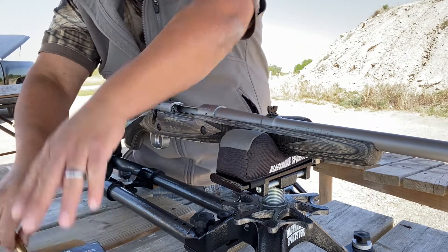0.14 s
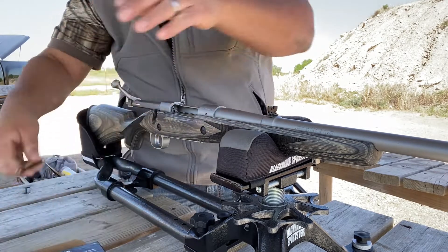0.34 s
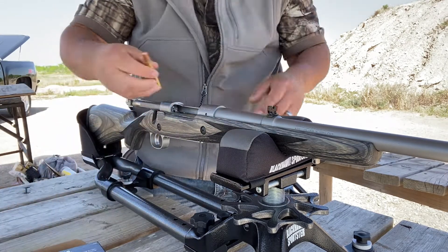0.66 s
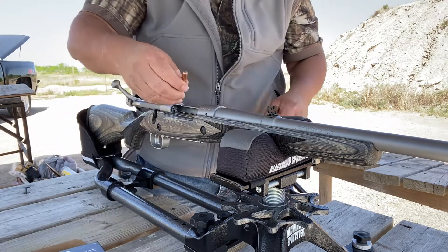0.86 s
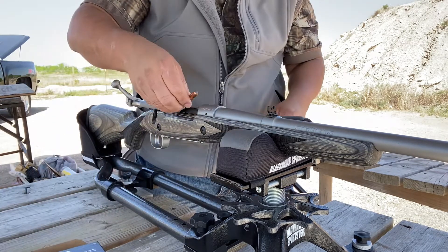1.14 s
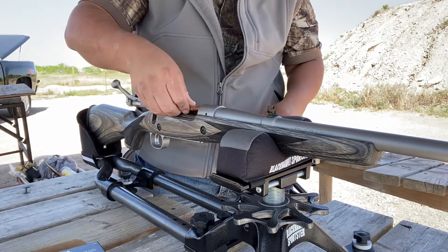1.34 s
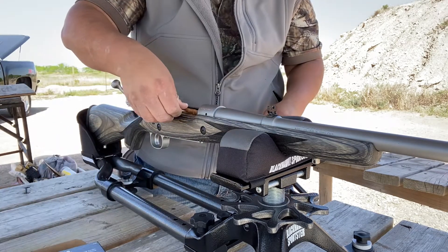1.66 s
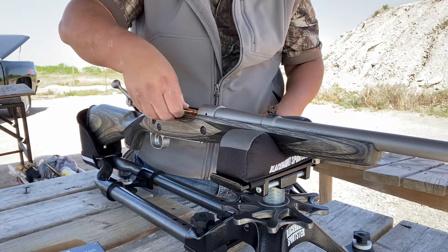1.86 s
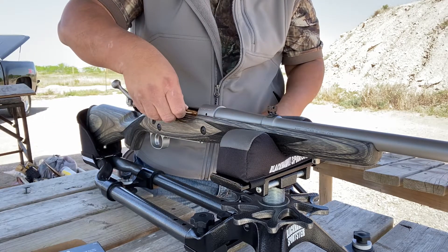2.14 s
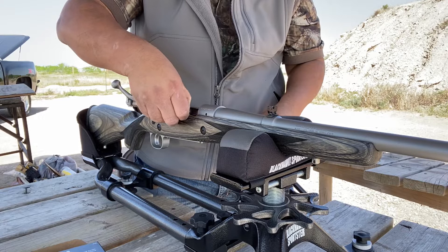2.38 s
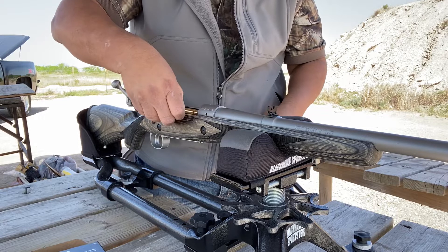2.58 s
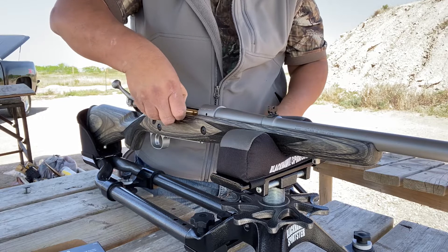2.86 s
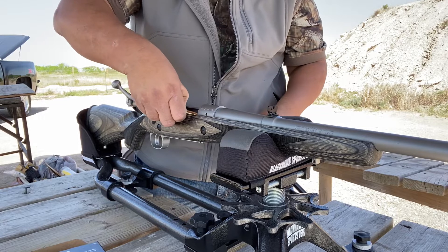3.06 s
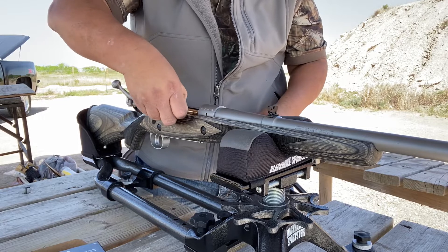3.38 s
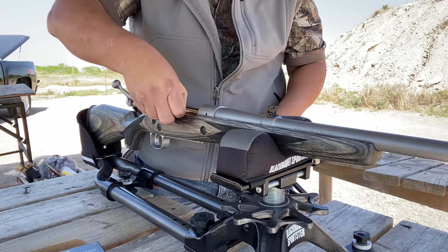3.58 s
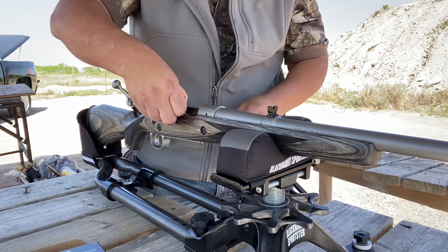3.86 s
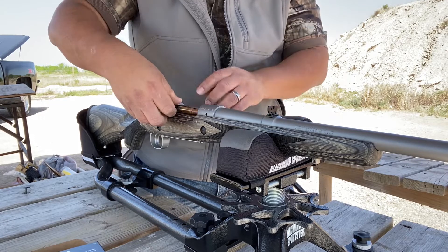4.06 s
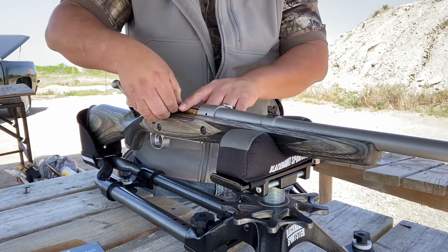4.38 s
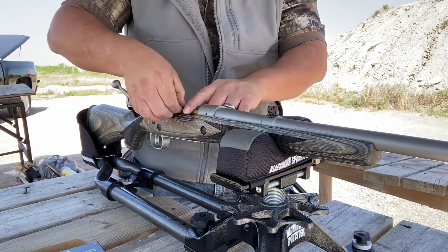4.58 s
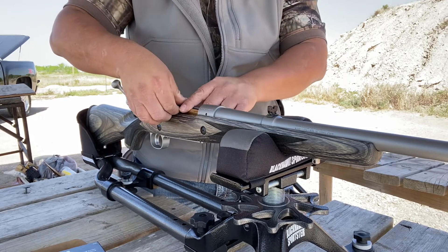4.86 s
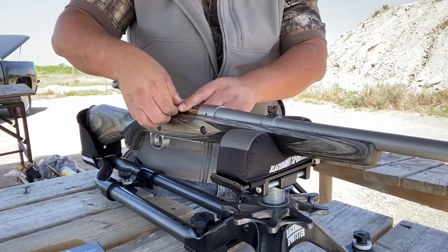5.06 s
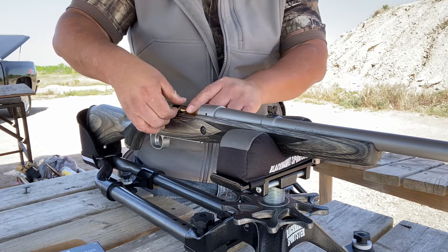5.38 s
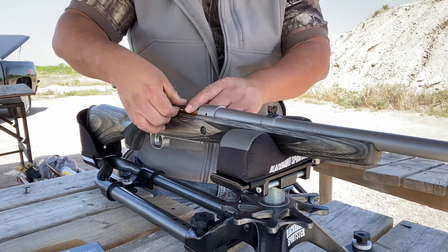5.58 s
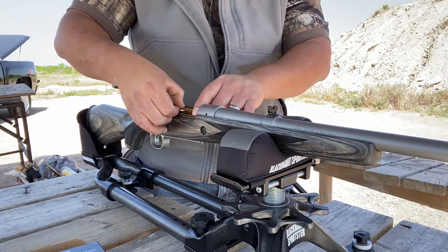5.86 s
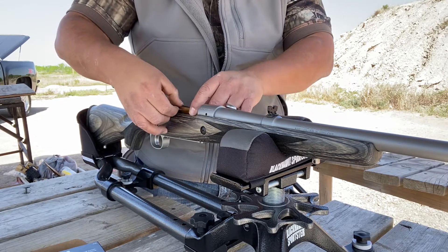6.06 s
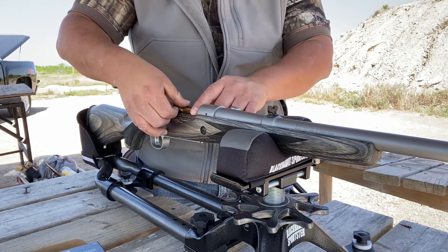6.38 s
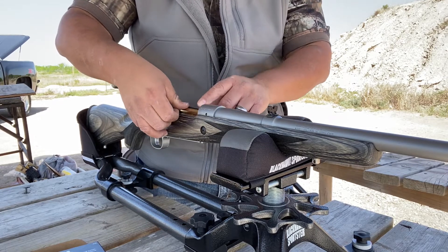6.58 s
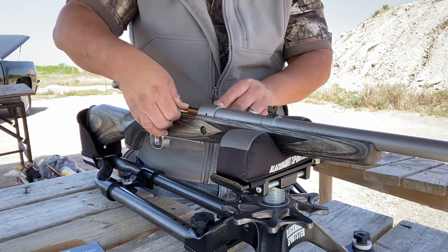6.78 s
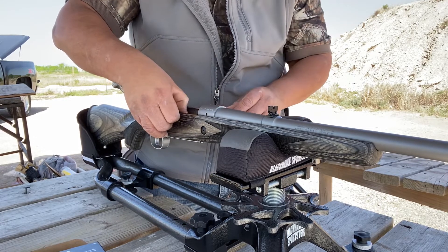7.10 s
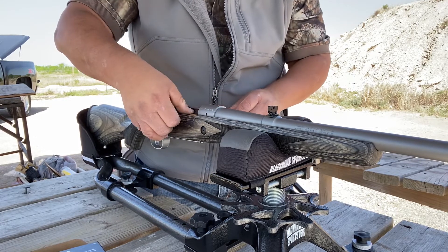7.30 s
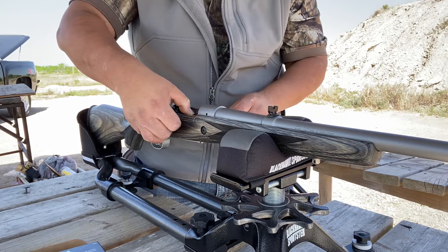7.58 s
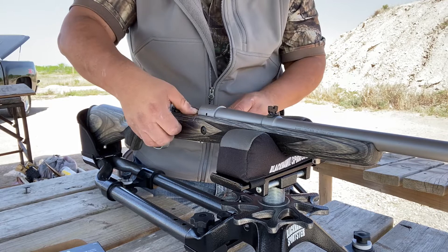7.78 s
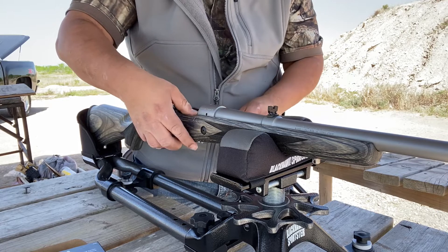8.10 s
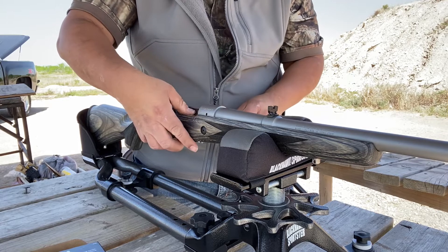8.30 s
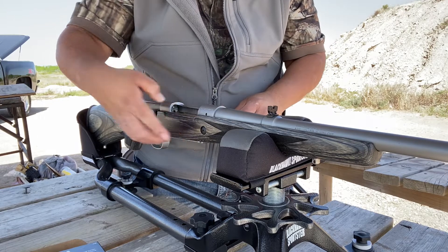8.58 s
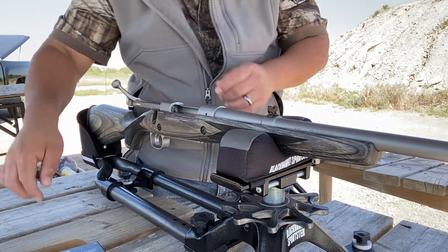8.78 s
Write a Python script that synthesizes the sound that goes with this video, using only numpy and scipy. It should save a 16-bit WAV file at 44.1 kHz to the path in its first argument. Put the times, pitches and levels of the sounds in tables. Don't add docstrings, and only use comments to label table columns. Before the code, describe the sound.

Outdoors, a box thuds onto wooden boards, then brass cartridges click, scrape and snap into a steel rifle magazine while wind buffets the microphone.

```python
import sys
import numpy as np
from scipy import signal
from scipy.fft import rfft, irfft, next_fast_len
from scipy.io import wavfile
from scipy.ndimage import uniform_filter1d, map_coordinates

SR = 44100
rng = np.random.default_rng(int(sys.argv[2]) if len(sys.argv) > 2 else 0)


def field_ratio(decibels):
    return 10 ** (np.asarray(decibels, dtype=float) / 20)


def unload_wav(signal):
    wavfile.write(
        sys.argv[1],
        SR,
        np.round(np.clip(np.atleast_2d(signal).T, -1, 1) * 32767).astype(np.int16),
    )


N = 394254

# pitch_hz, level_db, t60_s
STEEL = [(1860, -8, 0.04), (2360, -29, .04), (2900, -2.5, 0.0068), (3870, 3, 0.032), (4650, -26.5, 0.021),
         (5900, -20, 0.089), (7345, -6, 0.0064)]
# pitch_hz, level_db, t60_s
STOCK = [(834.7, -5, 0.17), (1113, -4, 0.091), (1315, -6, .06), (1586, -6.5, 0.042)]
# pitch_hz, level_db (per Hz)
SPARK = [(4000, -49), (6500, -3.5), (8200, 3.5), (12000, -7), (13800, -10), (14600, -12.5), (15700, -19),
         (16500, -64.5)]
# pitch_hz, level_db (per Hz)
KNOCK = [(200, -42.5), (500, 6.5), (1000, 2.5), (1600, -8), (3000, -47)]


def unit(x):
    return x / np.sqrt(np.mean(x ** 2) + 1e-20)


def along(points, hz):
    point_hz, value = np.transpose(points)
    return np.interp(np.log(hz + 1), np.log(point_hz + 1), value)


def curves(rows):
    s, *columns = np.transpose(rows)
    return [np.interp(np.arange(N) / SR, s, column) for column in columns]


def wobble(rate):
    knots = rng.standard_normal(int(N * rate / SR) + 4)
    return map_coordinates(knots, [np.arange(N) * rate / SR])


def filtered(x, response):
    m = next_fast_len(x.shape[-1] + 8192)
    spectrum = rfft(x, m) * response(np.fft.rfftfreq(m, 1 / SR))
    return irfft(spectrum, m)[..., :x.shape[-1]]


def noise(spectrum, shape):
    return unit(filtered(rng.standard_normal(shape), lambda hz: field_ratio(along(spectrum, hz))))


def steady(x):
    return x / np.sqrt(np.abs(uniform_filter1d(x ** 2, size=SR // 12)) + 1e-3)


def patchy(x, depth_db):
    z = signal.stft(x, nperseg=512)[2]
    field = uniform_filter1d(rng.standard_normal(z.shape[1:]), size=14, axis=0)
    field = uniform_filter1d(field, size=30, axis=1)
    return signal.istft(z * field_ratio(depth_db * unit(field)), nperseg=512)[1][:, :N]


def resonance(f, hz, width):
    return 1j * f * width / (hz * hz - f * f + 1j * f * width)


def ring(modes, t, spread_db, detune):
    hz, db, t60 = np.transpose(modes)[:, :, None]
    size = field_ratio(db + spread_db * rng.standard_normal(hz.shape) - 60 * t / t60)
    struck_hz = hz * (1 + detune * rng.standard_normal(hz.shape))
    turn = 2 * np.pi * (struck_hz * t + rng.random((2, *hz.shape)))
    onset = 1 - np.exp(-t / 0.00018)
    return (size * np.sin(turn)).sum(axis=1) * onset


def scrub():
    # pitch_hz, level_db (per Hz)
    scrub_colour = [(150, -38.5), (350, -5.5), (700, 0.5), (1200, -4.5), (1600, -19), (3000, -26),
                    (8000, -41), (13000, -31), (16300, -46)]
    swell = field_ratio(-65.5 + 0.44 * wobble(0.81) + 0.54 * wobble(26))
    return swell * patchy(noise(scrub_colour, (2, N)), depth_db=1.5)


def wind():
    # time_s, strength_db
    breeze = [(0, -35), (.28, -45.5), (1.0, -42), (1.63, -42), (1.94, -45), (2.22, -36), (2.42, -43),
              (2.97, -47.5), (3.75, -47), (4.0, -39.5), (4.8, -43), (4.88, -49), (5.4, -42), (5.49, -48),
              (5.76, -43), (6.7, -47.5), (7.75, -41.5), (8.94, -44.5)]
    # peak_s, half_length_s, rumble_db, flutter_db
    gusts = [(0.031, 0.09, -55, -34), (0.613, 0.029, -30.5, -56), (1.292, 0.058, -37.5, -47.5),
             (1.768, 0.066, -36.5, -44.5), (2.287, 0.03, -38, -22), (4.31, 0.018, -40, -33),
             (4.484, 0.032, -38, -47.5), (4.669, 0.045, -31, -38.5), (4.8, 0.034, -34, -42),
             (6.636, 0.034, -43.5, -43), (6.96, .13, -36.5, -42), (7.542, 0.14, -41, -37),
             (7.894, 0.17, -47, -41), (8.355, 0.11, -38.5, -48)]
    # pitch_hz, level_db (per Hz)
    rumble_colour = [(12, -37.5), (20, -19.5), (31, -14), (49, 5), (97, 2.5), (140, -7.5), (180, -32),
                     (310, -120)]
    # pitch_hz, level_db (per Hz)
    flutter_colour = [(70, -33.5), (110, 1), (160, 4.5), (250, -3), (400, -11), (800, -32), (1600, -72.5)]
    strength_db, = curves(breeze)
    mean_db = strength_db.mean()
    rumble = field_ratio(strength_db)
    flutter = field_ratio(mean_db - 6 + 1.3 * (strength_db - mean_db))
    for s, half, rumble_db, flutter_db in gusts:
        swell = np.exp(-((np.arange(N) / SR - s) / half) ** 2)
        rumble = np.hypot(rumble, field_ratio(rumble_db) * swell)
        flutter = np.hypot(flutter, field_ratio(flutter_db) * swell)
    rumble = rumble * steady(noise(rumble_colour, N))
    lumps = field_ratio(3.2 * wobble(25) + 3.7 * wobble(70))
    return rumble + flutter * steady(lumps * noise(flutter_colour, N))


def eddies():
    # time_s, pitch_hz, peak_db
    slaps = [
        (2.272, 318, -23.5),
        (2.298, 152.6, -14.5),
        (3.909, 196, -30.5),
        (4.644, 170, -33.5),
        (4.809, 103, -32.5),
        (8.364, 75.3, -28),
    ]
    # time_s, peak_db, pitch_hz
    puffs = [(0.642, -31, 113), (0.719, -34, 124), (0.768, -28.5, 105), (1.667, -27.5, 137),
             (1.757, -30, 91.5), (1.82, -24, 109), (1.983, -32.5, 137), (2.053, -30, 98), (2.147, -26, 169),
             (2.475, -28.5, 116), (3.998, -25.5, 179), (4.089, -28.5, 91.5), (4.211, -28, 129),
             (4.287, -29.5, 99), (4.314, -26, 91.5), (4.398, -29.5, 143), (4.463, -33, 107),
             (4.685, -30, 92.4), (5.551, -34, 101.6), (6.37, -40, 109), (6.624, -30, 126.6),
             (7.038, -31, 92), (7.42, -41, 146), (7.506, -27, 129), (7.61, -26.5, 91.5), (7.826, -27, 113),
             (7.949, -31.5, 183), (8.282, -33.5, 136), (8.712, -32.5, 262), (8.819, -35, 91.5)]
    cycles, puff_db = 1.3, -5.5
    out, torn = np.zeros(N), field_ratio(-21) * noise(KNOCK, N)
    t = np.arange(-SR // 16, SR // 16) / SR
    for s, hz, db in slaps + [(s + 1 / hz, hz, db + puff_db) for s, db, hz in puffs]:
        start = round(s * SR) - SR // 16
        at = slice(start, start + len(t))
        pressure = np.cos(2 * np.pi * hz * t) + torn[at] * (hz / 300) ** 2
        out[at] += field_ratio(db) * np.exp(-(t * hz / cycles) ** 2) * pressure
    return out


def rubbing():
    # start_s, hold_s, level_db
    brushes = [
        (0, 0.057, -63),
        (0.195, 0.48, -67),
        (1.161, .1, -73.5),
        (4.05, 0.2, -63),
        (6.746, .2, -70.5),
        (7.75, 0.12, -76),
        (8.9, .1, -63),
    ]
    # pitch_hz, level_db (per Hz)
    cloth = [(400, -22), (1000, 7), (2000, -2), (4000, -7), (7000, -7), (9500, -30)]
    rise_db_per_s, fall_db_per_s, still_db, bright_db = 131, 67, -82, -8
    t = np.arange(N) / SR
    level = field_ratio(still_db)
    for s, hold, db in brushes:
        before, past = np.maximum(s - t, 0), np.maximum(t - s - hold, 0)
        level = level + field_ratio(db - rise_db_per_s * before - fall_db_per_s * past)
    swish = noise(cloth, (2, N)) + field_ratio(bright_db) * noise(SPARK, (2, N))
    return level * field_ratio(0.64 * wobble(30)) * patchy(swish, depth_db=2.0)


def bench():
    # time_s, peak_db
    thuds = [
        (0.021, -6),
        (0.034, -8),
        (0.057, -12),
        (0.072, -16.5),
        (0.084, -19),
        (0.124, -23),
        (0.145, -17),
        (0.168, -22.5),
        (0.19, -32),
    ]
    # pitch_hz, width_hz, level_db
    boards = [(417, 16, -1), (780, 55, -5.5), (1600, 36, -28), (1730, 25, -27), (2450, 160, -81)]
    blows = np.zeros((2, N))
    puff = field_ratio(-60 * np.arange(SR // 10) / SR / 0.055)
    for s, db in thuds:
        blow = field_ratio(db + 6.0) * puff * rng.standard_normal((2, len(puff)))
        blows[:, round(s * SR):][:, :len(puff)] += blow

    def wood(f):
        return sum((-1) ** k * field_ratio(db) * resonance(f, hz, 3 * width) for k, (hz, width, db) in enumerate(boards))
    return filtered(blows, wood)


def slides():
    # start_s, level_db, pitch_hz, brightness_db, length_s
    strokes = [(0.093, -52, 4240, -9, .06), (1.167, -46.5, 3450, -20, 0.099), (1.79, -79, 3540, -28, 0.092),
               (2.072, -60.5, 1600, -20, 0.089), (2.48, -49.5, 1760, -9.5, 0.097),
               (2.528, -46, 3380, -25, 0.077), (2.568, -45, 1680, -21, .08),
               (3.016, -53.5, 950, -15, 0.071), (3.33, -51, 2540, -14, 0.062),
               (3.376, -55.5, 2520, -15, 0.09), (3.911, -48.5, 1790, -19, .07),
               (4.327, -59.5, 3300, -24, 0.075), (4.42, -60.5, 3120, -26, .08),
               (4.492, -52, 3700, -22, .07), (4.725, -58, 800, -30, 0.044), (0.135, -49, 1320, -22, .04),
               (5.457, -70, 3120, -20, 0.046), (5.623, -67, 2900, -21, 0.032),
               (5.676, -59.5, 3510, -14.5, 0.079), (5.854, -68, 2980, -17, 0.065),
               (6.18, -58.5, 2570, -21.5, 0.091), (6.433, -56.5, 3900, -29, 0.034),
               (6.499, -52, 3370, -29, .07), (6.585, -57, 3030, -27, 0.055), (6.726, -67, 3900, -15, 0.045),
               (6.908, -50, 1520, -22, 0.058), (7.0, -66.5, 2540, -7, .1), (7.387, -75.5, 5900, -6, 0.057),
               (7.476, -65.5, 3770, -8, 0.058), (7.628, -56.5, 1890, -34, .04),
               (7.699, -56, 4000, -8, 0.034), (7.875, -62, 3270, -10.5, 0.062),
               (7.9, -69.5, 5950, -15, 0.071), (8.015, -47, 3900, -11, 0.045),
               (8.046, -66.5, 4000, -15, 0.081), (8.202, -59, 3100, -9.5, 0.068)]
    # pitch_hz, level_db (per Hz)
    rasp_colour = [(500, -19), (1500, 8.5), (3500, -2.5), (4300, -3), (5500, -12), (9000, -26)]
    rise_share, fall_share = 0.3, 0.4
    out = np.zeros((2, N))
    rasp, spark = noise(rasp_colour, out.shape), noise(SPARK, out.shape)
    grain = unit(field_ratio(1.8 * wobble(70) + 4.4 * wobble(600)))

    def body(f):
        stock = sum(resonance(f, hz, 60) for hz, _, _ in STOCK)
        steel = sum(resonance(f, hz, 120) for hz, _, _ in STEEL)
        return 0.2 + 0.25 * stock + 0.19 * steel
    for s, db, hz, bright_db, length in strokes:
        u = np.arange(round(2 * length * SR)) / (length * SR)
        rise = 1 - np.exp(-(u / rise_share) ** 2)
        stroke = rise * field_ratio(-20 * np.maximum(u - 0.7, 0) / fall_share)
        at = slice(round(s * SR), round(s * SR) + len(u))
        part = unit(filtered(grain[at] * rasp[:, at], lambda f: body(f) + 1.5 * resonance(f, hz, hz / 18)))
        out[:, at] += field_ratio(db) * stroke * (part + field_ratio(bright_db) * grain[at] * spark[:, at])
    return out


def brass():
    # time_s, body_db, neck_db
    rings = [(1.262, -49, -48), (1.352, -60, -53), (1.412, -35, -26.5), (1.441, -31.5, -38.5),
             (1.488, -42.5, -53), (1.501, -49.5, -53), (3.999, -40, -25), (4.144, -49, -36.5),
             (4.165, -39, -60), (4.197, -36, -51.5), (4.215, -55, -37), (4.235, -30, -42), (4.33, -51, -60),
             (5.256, -61, -50), (5.968, -51, -56), (6.466, -57, -62)]
    # pitch_hz, level_db, t60_s
    body = [(3361, 8.5, 0.92), (3700, -9, 0.13)]
    # pitch_hz, level_db, t60_s
    neck = [(8060, 1.5, .09), (8100, 0, 0.11)]
    t = np.arange(SR // 6) / SR
    out = np.zeros((2, N + len(t)))
    grip = field_ratio(-60 * np.maximum(t - 0.011, 0) / 0.04)
    for s, body_db, neck_db in rings:
        case = field_ratio(body_db) * grip * ring(body, t, spread_db=1.0, detune=0.006)
        case = case + field_ratio(neck_db) * ring(neck, t, spread_db=1.5, detune=0.0067)
        out[:, round(s * SR):][:, :len(t)] += case
    return out[:, :N] * field_ratio(2.9 * wobble(150))


def clangs():
    # time_s, pitch_hz, peak_db
    pushes = [(.02, 900, -23.5), (.145, 1350, -34), (.168, 1100, -43), (.058, 1900, -44),
              (2.343, 1900, -25), (2.341, 1370, -27), (5.425, 530, -45), (5.612, 890, -52), (3.8, 340, -40),
              (3.3, 380, -36.5), (2.995, 500, -43.5), (6.192, 484, -41), (3.799, 1380, -24),
              (3.8, 2034, -23), (3.962, 1860, -35.5), (3.99, 1172, -16), (7.4, 990, -43), (7.72, 1420, -40),
              (8.028, 1850, -40.5), (8.032, 4000, -35.5)]
    # time_s, peak_db, pitch_hz
    pings = [(0.145, -29, 785), (1.106, -29, 2460), (1.157, -20, 3420), (1.209, -24, 3520),
             (1.24, -16, 3520), (1.262, -16, 3920), (2.108, -37.5, 1540), (2.149, -34.5, 2500),
             (2.574, -14, 1190), (2.577, -17.5, 830), (2.672, -22.5, 2880), (2.75, -32, 1180),
             (2.994, -35, 703), (3.042, -26, 860), (3.335, -21.5, 1126), (3.382, -19, 1550),
             (3.649, -33, 851), (3.934, -27, 2200), (4.144, -28, 3270), (4.197, -20.5, 3340),
             (4.577, -26.5, 2990), (5.124, -39.5, 3915), (5.157, -30, 1360), (5.455, -46, 1150),
             (5.659, -29, 1785), (5.968, -25.5, 1640), (6.0, -27.5, 3660), (6.101, -32, 3020),
             (6.397, -37.5, 3900), (6.43, -23.5, 3490), (6.466, -28, 3010), (6.729, -40, 3880),
             (6.852, -48, 820), (6.899, -24, 1370), (6.948, -17, 3910), (7.07, -43, 727),
             (7.721, -19, 3120), (8.212, -31.5, 1350)]
    # time_s, pitch_hz, peak_db
    springs = [
        (1.907, 3500, -68),
        (2.343, 2120, -47.5),
        (2.574, 813, -41),
        (3.651, 840, -52.5),
        (5.124, 3870, -59),
        (5.256, 3870, -48),
        (6.515, 840, -52),
    ]
    push_t60_s, ping_t60_s, spring_t60_s, ping_db = 0.057, 0.021, 0.22, -7.5
    t = np.arange(SR // 5) / SR
    out = np.zeros((2, N))
    rocking = field_ratio(6 * wobble(350) - 4)
    notes = [(*row, push_t60_s) for row in pushes]
    notes += [(s, hz, db + ping_db, ping_t60_s) for s, db, hz in pings]
    for s, hz, db, t60 in notes:
        pair = [(hz, db, t60), (0.95 * hz, db - 5.5, t60)]
        out[:, round(s * SR):][:, :len(t)] += ring(pair, t, spread_db=0, detune=0)
    for s, hz, db in springs:
        at = slice(round(s * SR), round(s * SR) + len(t))
        out[:, at] += rocking[at] * ring([(hz, db, spring_t60_s)], t, spread_db=0, detune=0)
    return out


def touches():
    # time_s, peak_db, knock_db, brightness_db
    clicks = [(0.02, -27, 2, -13.5), (1.1059, -19, -30.5, -18), (1.1572, -18, -14.5, -11.5),
              (1.2095, -19, -24, -17.5), (1.3531, -25.5, -13, -15.5), (1.4175, -15, -10, -9.5),
              (1.4404, -21.5, -27, -13), (1.445, -19, -15.5, -13.5), (1.488, -21.5, -15, -13),
              (1.5007, -31, -24, -14), (2.5306, -32.5, -11, -20.5), (2.6719, -18.5, -13, -13.5),
              (2.7492, -27.5, -6, -21), (3.3366, -20, -0.5, -16.5), (3.373, -26, -6.5, -16.5),
              (3.6479, -27.5, -9.5, -24), (3.9596, -30, -10, -10), (4.0064, -27.5, -10.5, -29),
              (4.145, -25.5, -29.5, -7.5), (4.165, -25.5, -13, -29.5), (4.2131, -21.5, -16.5, -8.5),
              (4.2333, -20, -14, -21.5), (4.314, -34, -8.5, -28.5), (5.258, -26.5, -13, -24),
              (5.6584, -24, -18.5, -18.5), (5.9675, -24.5, -0.5, -20), (6.2203, -32, -12, -14),
              (6.9456, -21.5, -15, -6), (7.7212, -14, -13, -11.5), (8.0326, -29, -16, -12)]
    # time_s, peak_db, knock_db, brightness_db
    seats = [(1.2398, -15, -12, -12), (1.2616, -19, -7.5, -5), (1.4098, -20, -7, -20.5),
             (2.341, -15, -16, -10.5), (2.5735, -15, -4.5, -9.5), (2.5954, -22.5, -0.5, -16),
             (3.382, -20, -8.5, -16), (3.934, -25.5, -29, -15.5), (4.1962, -23, -6.5, -23),
             (4.2736, -25, -14, -25), (4.283, -31.5, -10, -17), (4.3317, -26, -15.5, -18),
             (4.5769, -22.5, -33.5, -24.5), (5.1588, -28.5, -8, -17), (6.0007, -26.5, -10, -11.5),
             (6.1, -30, -30, -18), (6.4288, -28.5, -24, -30), (6.4653, -25, -16, -17.5),
             (6.8976, -20, -22.5, -13.5), (6.9108, -25, -7, -16)]
    # time_s, peak_db, brightness_db
    ticks = [(1.5187, -34.5, -22), (1.907, -52.5, -12), (1.9901, -48.5, -30), (2.149, -39.5, -18),
             (3.698, -38.5, -26), (3.8917, -44.5, -15), (4.5047, -39, -32), (4.5364, -38.5, -27),
             (5.1231, -37.5, -18), (5.4549, -42, -18.5), (5.6725, -41, -30.5), (5.8853, -50, -19.5),
             (5.9541, -31.5, -15), (6.0304, -33, -18), (6.3977, -35.5, -12), (6.7299, -39.5, -21.5),
             (6.8494, -43, -26), (6.99, -45, -17), (7.0688, -41.5, -29), (7.157, -46, -27),
             (7.1836, -45, -33), (7.2, -45.5, -21), (7.2249, -38, -21.5), (7.5888, -46.5, -30.5),
             (7.816, -57.5, -27.5), (8.188, -46, -21.5), (8.209, -32.5, -15.5)]
    # time_s, peak_db, knock_db
    bumps = [(0.0568, -50, 9.5), (2.1047, -33, 0), (2.9858, -52, 3), (2.9939, -39, 11.5),
             (3.0435, -31.5, 5), (3.3138, -47, 6), (3.4216, -46, 10.5), (4.5201, -39, 0),
             (4.6918, -58.5, 12.5), (4.732, -48.5, 17), (6.1899, -52, 15), (6.4411, -51, 2),
             (7.6326, -53.5, 26), (8.4197, -56.5, 1)]
    # time_s, peak_db, knock_db,
    # brightness_db, t60_s
    hits = [(2.333, -31.5, -4, -25, 0.056), (3.777, -26.5, -6, -20.5, .02), (3.782, -33.5, -28, -8, 0.012),
            (3.79, -15, -31, 0.5, 0.016), (3.79, -6.5, -20, -10, 0.039),
            (3.9759, -19.5, -14.5, -10, 0.016), (3.985, -13, -23.5, -5, 0.028),
            (3.99, -6, -15, -8.5, 0.051), (3.997, -8.5, -14.5, -1.5, 0.029), (2.3445, -15, -12, -9, .04),
            (2.578, -15, -8, -9.5, .04), (1.413, -20, -15.5, -12, 0.02), (.033, -36, -8, -8, 0.018),
            (6.515, -40, -1, -25, .03), (5.473, -52, -10, -20, 0.018)]
    click_t60_s, seat_t60_s, tick_t60_s, bump_t60_s = 0.022, 0.034, 0.021, 0.021
    tick_knock_db, bump_bright_db = -10, -25
    rows = [(*row, click_t60_s) for row in clicks]
    rows += [(*row, seat_t60_s) for row in seats]
    rows += [(s, db, tick_knock_db, bright_db, tick_t60_s) for s, db, bright_db in ticks]
    rows += [(*row, bump_bright_db, bump_t60_s) for row in bumps]
    return sorted(rows) + hits


def contacts():
    # pitch_hz, level_db (per Hz)
    crack_colour = [(500, -54), (1200, -6), (2200, -4.5), (4500, -6.5), (7000, -14), (10000, -43)]
    lead = SR // 50
    t = np.arange(-lead, SR // 6) / SR
    after = np.maximum(t, 0)
    out = np.zeros((2, N + len(t)))
    crack, spark, knock = (noise(colour, out.shape) for colour in (crack_colour, SPARK, KNOCK))

    def modes(f):
        return 0.35 + sum((-1) ** k * field_ratio(db) * resonance(f, hz, 160) for k, (hz, db, _) in enumerate(STEEL))
    rattle = unit(filtered(crack, modes))
    judder = field_ratio(1.6 * wobble(300))
    rise = 1 - np.exp(-(after / 0.00079) ** 2)
    build = (t < 0.001) * field_ratio(-24.5 + 60 * np.minimum(t, 0) / 0.038)
    tail = rise * field_ratio(-17 - 60 * after / 0.15)
    for s, db, knock_db, bright_db, t60 in touches():
        at = slice(round(s * SR), round(s * SR) + len(t))
        snap = build + rise * (field_ratio(-0.5 - 60 * after / 0.0033) + field_ratio(-3.5 - 60 * after / t60))
        sharp = build + rise * (field_ratio(-80 * after / t60) + field_ratio(-27 - 60 * after / 0.12))
        hit = field_ratio(db - 7) * (crack[:, at] * snap + rattle[:, at] * tail)
        hit = hit + field_ratio(db - 21) * ring(STEEL, after, spread_db=2.5, detune=0.02)
        hit = hit + field_ratio(db + bright_db + 1.0) * spark[:, at] * sharp
        wood = knock[:, at] * (snap + tail) + field_ratio(-5.5) * ring(STOCK, after, spread_db=3.5, detune=0.017)
        out[:, at] += hit + field_ratio(db + knock_db - 8.0) * wood
    return out[:, lead:N + lead] * judder


def ports(pair):
    # pitch_hz, lead_radians
    left_lead = [(300, 0), (1100, -.6), (3200, -1.2), (6200, -1.5), (8300, -2.0), (9300, -3.14),
                 (10400, -4.4), (11600, -6.0), (13000, -6.6), (14600, -9.42), (15600, -11.3),
                 (16300, -11.5)]
    # pitch_hz, common_share
    common = [(300, .97), (600, .6), (1100, .85), (3000, .8), (7000, .8), (9000, .998), (10000, .995),
              (12500, .9), (14600, .99), (16000, .95)]
    # pitch_hz, level_db
    louder_left = [(300, 0.5), (700, 1.5), (2500, -0.5), (8000, 2), (13000, 1)]

    def split(hz):
        angle = np.arccos(np.clip(along(common, hz), 0, 1)) / 2
        return np.array([np.cos(angle), np.sin(angle)])

    def offset(hz):
        turn = np.exp(0.5j * np.outer([1, -1], along(left_lead, hz)))
        return turn * field_ratio(np.outer([0.5, -0.5], along(louder_left, hz)))
    direct, scattered = filtered(pair, split)
    return filtered(np.array([direct + scattered, direct - scattered]), offset)


def scene():
    airborne = contacts() + brass() + slides() + bench() + rubbing() + scrub()
    buffeting = wind() + eddies()
    return ports(airborne + clangs()) + buffeting


def top_cut(x):
    return signal.sosfilt(signal.butter(12, 16640, fs=SR, output="sos"), x)


def record(dry):
    return top_cut(dry)


dry = scene()
out = record(dry)
unload_wav(out)
```